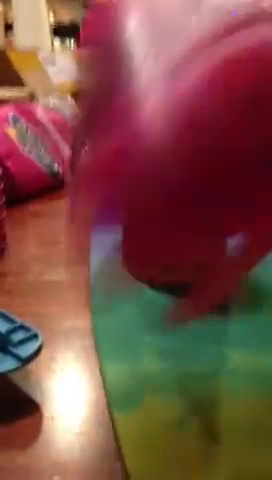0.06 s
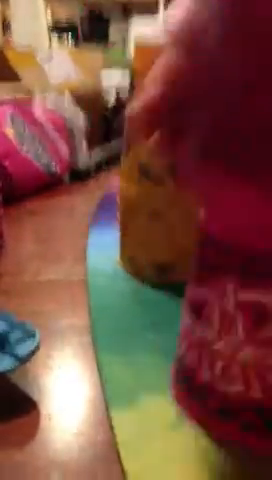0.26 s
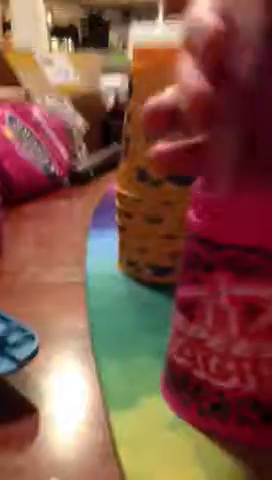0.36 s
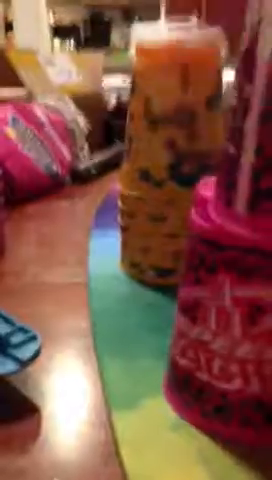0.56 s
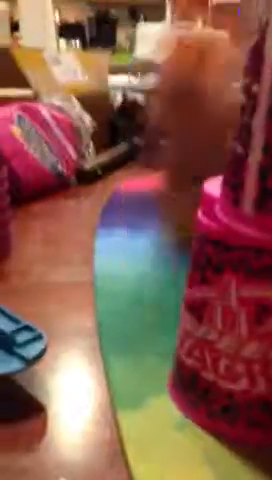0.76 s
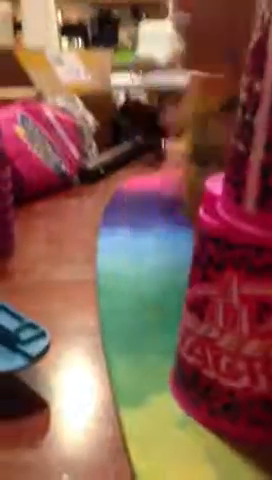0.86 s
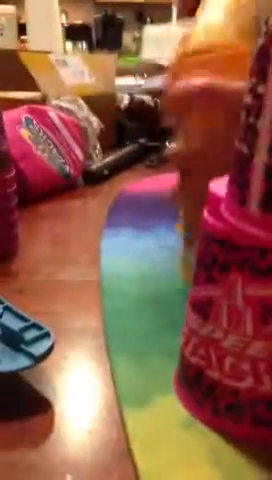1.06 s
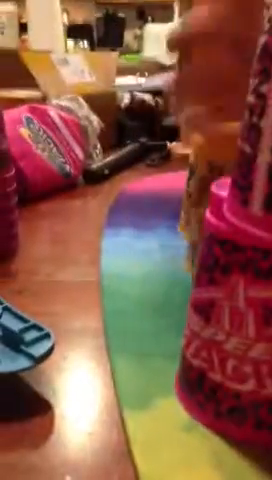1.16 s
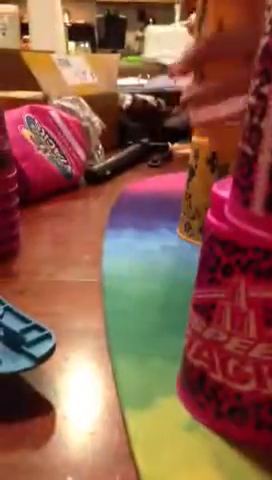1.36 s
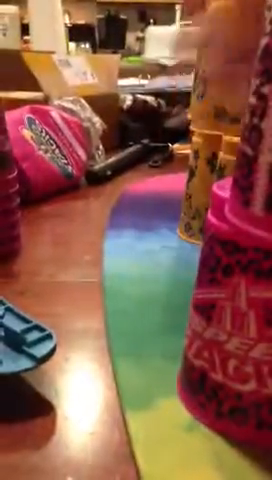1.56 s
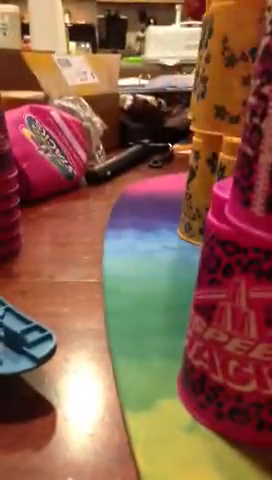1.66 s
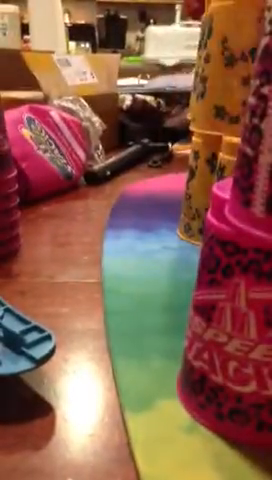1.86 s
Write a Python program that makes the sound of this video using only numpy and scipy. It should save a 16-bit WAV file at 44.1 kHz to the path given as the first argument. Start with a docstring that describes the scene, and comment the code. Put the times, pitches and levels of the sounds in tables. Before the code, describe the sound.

Plastic cups being speed-stacked on a mat, close in a small room. Light knocks, ticks and rubs open, with a hard clack at 0.26 s and another at 0.33, then the loudest tight cluster at 0.45-0.47, humming hollowly. A lull has soft rubs and faint breathy pulls around 0.75-0.95. Sparse knocks and thuds come at 1.1-1.35, a fast rattle at 1.45-1.53, a last clatter at 1.61, then a faint slide.

```python
"""Plastic cups are stacked and swept together fast on a mat, close to a small microphone in a room.
Over mat rumble and faint room noise, a rub of friction noise leads into knocks of flexing walls and rim cracks;
bright ticks, dull thuds and beating hums join in, up to the hardest clack, and the level dips briefly.
Soft rubs and breathy, rising puffs follow, then sparser knocks, a fast rattle, a last clatter and a faint slide.
Table and walls throw the clatter back as a few reflections and a diffuse noise tail."""
import sys
import numpy as np
from scipy import signal
from scipy.fft import rfft, irfft
from scipy.io import wavfile

SR = 44100
rng = np.random.default_rng(int(sys.argv[2]) if len(sys.argv) > 2 else 0)


def dump(signal):
    """Clip the signal to [-1, 1] and save it as 16-bit WAV at the path in sys.argv[1]."""
    limited = np.clip(np.atleast_2d(signal).T, -1, 1)
    pcm = np.round(limited * 32767).astype(np.int16)
    wavfile.write(sys.argv[1], SR, pcm)


N = 83790  # length in samples, 1.9 s


def amp(db):
    """Turns decibels into a linear gain."""
    return 10 ** (np.asarray(db) / 20)


def read(points, hz):
    """Reads a spectrum table, joined on a log-frequency axis."""
    f, value = np.transpose(points)
    return np.interp(np.log(hz + 1), np.log(f + 1), value)


def level(points):
    """A gain that follows a table of (t/s, level/dB)."""
    return amp(np.interp(np.arange(N) / SR, *np.transpose(points)))


def peak(hz, centre_hz, octaves):
    """A bell of height 1 on a log-frequency axis."""
    return np.exp(-(np.log2((hz + 1) / centre_hz) / octaves) ** 2)


def evened(x):
    """Scales a signal to unit RMS."""
    return x / np.sqrt(np.mean(x ** 2) + 1e-20)


def add(mix, s, sound):
    """Mixes a sound in at time s, trimmed to the ends of the mix."""
    at = round(s * SR)
    sound = sound[max(-at, 0):]
    part = mix[max(at, 0):][:len(sound)]
    part += sound[:len(part)]


def noise(colour, size):
    """Unit-RMS noise with a given spectrum."""
    gain = amp(read(colour, np.fft.rfftfreq(size, 1 / SR)))
    return evened(irfft(rfft(rng.standard_normal(size)) * gain, size))


def fade(t, t60):
    """Exponential decay that falls 60 dB in t60 seconds."""
    return np.exp(-np.log(1000) * t / t60)


def rise(t, rise_s):
    """A soft onset from silence, about two thirds open after rise_s seconds."""
    return 1 - np.exp(-(t / rise_s) ** 2)


def mode(t, hz, t60):
    """One resonance: a decaying sine."""
    return np.sin(2 * np.pi * hz * t) * fade(t, t60)


RUB_PEAK_DB, RUB_OCTAVES = 10, 0.97  # emphasis at the brightest pitch, and its spread
SLIPS_PER_S, SLIP_SHARE = 900, 0.62  # average slip rate; slip gain beside the friction noise
GRIP_DB, GRIP_S = 5.5, .002  # how strongly the grip comes and goes (deviation), time between its random points
# colour of plastic rubbing on plastic: (f/Hz, level/dB)
RUB = [(60, -27.5), (1300, 1), (4000, 3.5), (8000, -2.5), (11000, -5.5), (15500, -7.5)]
# cups sliding in one another: (t/s, length/s, level/dB, brightest f/Hz)
SLIDES = [(-.01, 0.038, -44, 4530), (.064, 0.039, -47, 5460), (.187, 0.054, -31.5, 5200),
          (.226, 0.019, -30.5, 7600), (.283, 0.022, -30.5, 6100), (.314, 0.014, -35.5, 4400),
          (.695, 0.11, -53.5, 2300), (.781, 0.018, -32, 7650), (.8, 0.093, -52.5, 6140),
          (.868, 0.073, -41, 4560), (1.022, 0.043, -50, 5530), (1.085, 0.047, -56.5, 6500),
          (1.227, 0.016, -45, 6600), (1.73, 0.086, -57, 4270)]


def slide(length, db, bright_hz):
    """Fine friction and small slips of plastic on plastic, swelling and dying with the stroke."""
    t = np.arange(SR // 2) / SR
    hz = np.fft.rfftfreq(len(t), 1 / SR)
    slips = rng.standard_normal(len(t)) * (rng.random(len(t)) < SLIPS_PER_S / SR)
    grip_curve = np.interp(t / GRIP_S, np.arange(len(t)), rng.standard_normal(len(t)))
    grip = evened(amp(GRIP_DB * grip_curve))
    drive = grip * rng.standard_normal(len(t)) + SLIP_SHARE * evened(slips)
    colour = read(RUB, hz) + RUB_PEAK_DB * peak(hz, bright_hz, RUB_OCTAVES)
    friction = evened(irfft(rfft(drive) * amp(colour), len(t)))
    stroke = np.sin(np.pi * np.minimum(t / length, 1))
    return amp(db) * friction * stroke


# rumble colour: (f/Hz, level/dB)
RUMBLE = [(40, -42), (150, -1.5), (240, 0), (800, -15), (8000, -51)]
# hands and cups shifting on the mat: (t/s, level/dB)
RUMBLE_LEVEL = [(0, -38), (.21, -55), (.3, -36.5), (.42, -54.5), (.5, -46.5), (.69, -64.5), (.8, -37.5),
                (.87, -54), (.95, -48), (1.04, -66), (1.16, -47.5), (1.31, -58), (1.4, -57.5), (1.9, -63.5)]


def mat_rumble():
    """Low noise of hands and cups shifting on the mat, swelling and sinking."""
    return level(RUMBLE_LEVEL) * noise(RUMBLE, N)


FLOOR_DB = -60
# room noise colour: (f/Hz, level/dB)
FLOOR = [(30, -16), (200, -15.5), (800, -6.5), (1200, -14), (4000, -11), (6400, -13.5), (8000, -19),
         (16000, -30)]


def room_noise():
    """Faint steady noise of the room."""
    return amp(FLOOR_DB) * noise(FLOOR, N)


WALL_T60, WALL_RISE_S, WALL_DB = 0.014, 0.0017, 8.5  # wall decay (s), onset (s) and lift (dB)
HOLLOW_RISE_S = 0.00094
# air in the cups: (multiple of the hollow pitch, level/dB, t60/s)
HOLLOW = [(0.638, -11, 0.098), (0.999, 6, 0.038), (1.21, -8, 0.054), (1.482, -15, 0.064)]


def flex(wall_db, wall_hz, hollow_db, hollow_hz):
    """The wall flexes for a few cycles and the air inside rings on."""
    t = np.arange(SR // 8) / SR
    wall = mode(t, wall_hz, WALL_T60) * rise(t, WALL_RISE_S)
    air = sum(amp(db) * mode(t, hollow_hz * ratio, t60) for ratio, db, t60 in HOLLOW)
    hollow = air * rise(t, HOLLOW_RISE_S)
    return amp(hollow_db) * hollow - amp(wall_db + WALL_DB) * wall


SHELL_SPREAD, SHELL_DB = 0.02, -12  # random detuning of each mode (fraction); shell level in the crack
CRACK_T60 = 0.019  # s
RIM_DB, RIM_T60, RIM_ROLLOFF = -1, 0.015, 1.92  # ping level, decay (s); crack dulls above this multiple of rim f
# stiff plastic shell, before detuning: (f/Hz, level/dB, t60/s)
SHELL = [(1480, -8.5, 0.02), (1810, -1.5, 0.04), (3210, -16, 0.057), (4207, -6, 0.038), (5320, -7.5, 0.051),
         (6600, -25, 0.045)]
# crack colour before the rim rolloff: (f/Hz, level/dB)
CRACK = [(60, -2), (900, 5), (1700, 6), (2400, -1), (3500, 1), (7000, -0.5), (10000, -15), (15500, -35)]
# cup knocks: (t/s, wall level/dB before WALL_DB, wall f/Hz, hollow level/dB, hollow f/Hz,
# rim crack level/dB, rim f/Hz)
KNOCKS = [ (.001, -28, 320, -30.5, 615, -39, 4030), (.035, -20.5, 373, -32, 687, -30, 2040),
          (.0488, -35, 330, -32.5, 658, -41, 3420), (.1008, -25.5, 584, -29.5, 872, -29.5, 1670),
          (.2415, -23, 335, -26, 602, -49, 2500), (.261, -8.5, 461, -15, 735, -11.5, 1670),
          (.3265, -11, 446, -24, 754, -22.5, 3030), (.4452, -11.5, 435, -21, 776, -30, 1930),
          (.4605, -8.5, 518, -14, 812, -12.5, 6200), (.4652, -6, 540, -18.5, 714, -19, 1850),
          (.471, -7, 580, -19, 878, -17.5, 4060), (.9494, -29, 244, -37, 819, -32, 3300),
          (1.11, -10.5, 356, -25, 665, -38, 2160), (1.2296, -17, 452, -28.5, 634, -35, 2800),
          (1.2651, -30, 422, -34, 615, -36.5, 4000), (1.4486, -7, 517, -17.5, 806, -22.5, 3290),
          (1.4617, -10, 490, -19, 797, -30.5, 3450), (1.4749, -18.5, 510, -27, 875, -29.5, 3200),
          (1.4855, -26, 527, -29.5, 760, -46, 3020), (1.4947, -13.5, 488, -28, 835, -33, 4220),
          (1.5065, -17, 493, -25.5, 783, -38.5, 4300), (1.529, -31, 555, -37.5, 767, -35.5, 5320),
          (1.6133, -7, 552, -19, 783, -18, 4830), (1.6171, -6.5, 520, -13.5, 817, -16, 4200),
          (1.6248, -13.5, 543, -36, 770, -36, 2530)]


def knock(wall_db, wall_hz, hollow_db, hollow_hz, crack_db, rim_hz):
    """Cup on cup: the body flexes, and the rim cracks, pings and rings the shell's modes."""
    t = np.arange(SR // 8) / SR
    hz = np.fft.rfftfreq(len(t), 1 / SR)
    shell = np.zeros(len(t))
    for f, db, t60 in SHELL:
        detuned_hz = f * (1 + SHELL_SPREAD * rng.standard_normal())
        shell += amp(db) * rng.choice([-1, 1]) * mode(t, detuned_hz, t60)
    contact = 1 / (1 + (hz / (RIM_ROLLOFF * rim_hz)) ** 2) ** .5
    burst = evened(irfft(rfft(noise(CRACK, len(t))) * contact, len(t)))
    ping = amp(RIM_DB) * mode(t, rim_hz, RIM_T60)
    crack = burst * fade(t, CRACK_T60) + amp(SHELL_DB) * shell + ping
    return flex(wall_db, wall_hz, hollow_db, hollow_hz) + amp(crack_db) * crack


# room level follows how far the cups are from the microphone: (t/s, level/dB)
ROOM_SEND = [(.1, -3.5), (.3, -7), (.47, -9), (.8, -3), (1.45, 3), (1.62, 0)]
# near reflections: (delay t/s, linear gain)
ECHOES = [(.0046, 0.027), (.0098, 0.1), (0.0194, 0.025)]
# tail decay: (f/Hz, t60/s)
ROOM_T60 = [(150, 0.48), (400, 0.27), (900, 0.5), (5000, 0.15), (15000, 0.23)]
# tail colour: (f/Hz, level/dB)
ROOM_DB = [(60, -28), (170, -3.5), (300, -6), (600, -12), (950, -12.5), (1300, -8.5), (2200, -5),
           (4500, -5), (12000, -8)]
ROOM_RISE_S = 0.0029


def room(cups):
    """A few near reflections and a diffuse tail whose bands die at their own speeds."""
    hz, t, bands = signal.stft(rng.standard_normal(SR * 3 // 4), SR, nperseg=512)
    t60 = read(ROOM_T60, hz)[:, None]
    # the last factor evens out the energy of short and long decays
    even = np.sqrt(2 * np.log(1000) / (t60 * SR))
    bands = bands * fade(t, t60) * amp(read(ROOM_DB, hz))[:, None] * even
    response = signal.istft(bands, SR, nperseg=512)[1]
    response = response * rise(np.arange(len(response)) / SR, ROOM_RISE_S)
    for delay, gain in ECHOES:
        add(response, delay, np.array([gain]))
    return signal.fftconvolve(cups * level(ROOM_SEND), response)[:N]


TICK_T60 = 0.014  # s
# tick colour: (f/Hz, level/dB)
TICK = [(200, -9), (1800, -9.5), (3300, 5), (7500, -1), (10000, -8.5), (15500, -16.5)]
# rims clicking past each other: (t/s, level/dB)
TICKS = [(.0471, -23), (.0555, -31), (.086, -30), (.128, -43), (.136, -28), (.2483, -25), (.261, -18),
         (.4648, -21), (.1955, -26), (.208, -22.5), (.219, -30), (.7823, -36.5), (.853, -39.5),
         (.9145, -38)]


def tick(db):
    """A thin bright click of two rims: a quickly dying noise burst."""
    t = np.arange(SR // 20) / SR
    return amp(db) * noise(TICK, len(t)) * fade(t, TICK_T60)


THUD_HOLLOW_DB, THUD_HOLLOW_HZ = -20.5, 604  # air level relative to the tabled wall level; air pitch
# dull thuds of cups against the mat and the hands: (t/s, wall level/dB before WALL_DB, wall f/Hz)
THUDS = [(.0891, -24, 450), (.1302, -26, 590), (.1566, -26, 278), (.166, -27, 338), (.2889, -20.5, 383),
         (.3, -15, 378), (.3432, -20, 470), (.37, -23.5, 362), (.856, -34, 564), (1.071, -34.5, 380),
         (1.1218, -24, 334), (1.1575, -25, 445), (1.2345, -18, 292), (1.288, -25, 370), (1.3469, -29, 353),
         (1.372, -37.5, 266), (1.569, -25, 470), (1.576, -26, 527), (1.757, -43, 710)]


def thud(db, hz):
    """A cup meets the mat or a hand: it flexes without a crack."""
    return flex(db, hz, db + THUD_HOLLOW_DB, THUD_HOLLOW_HZ)


HUM_T60, HUM_SPREAD = 0.38, 0.051  # decay (s); random detuning from cup to cup (fraction)
# upright cups that hum on after a hard knock: (t/s, centre f/Hz, level/dB)
HUMS = [(.328, 1043, -46.5), (.464, 943, -31), (1.264, 642, -51), (1.45, 823, -46), (1.614, 840, -41.5)]


def hum(hz, db, count=12):
    """The air in a few untouched cups, not quite in tune with one another, rings on, beating."""
    t = np.arange(SR // 2) / SR
    cups = np.zeros(len(t))
    for _ in range(count):
        cup_hz = hz * (1 + HUM_SPREAD * rng.standard_normal())
        cups += rng.choice([-1, 1]) * mode(t, cup_hz, HUM_T60)
    return amp(db) * cups / np.sqrt(count)


DIP_START_S, DIP_S, DIP_DB = 0.47, 0.34, -3.5


def level_dip():
    """The level dips briefly after the hardest clack, deepest halfway through."""
    return level([(DIP_START_S, 0), (DIP_START_S + DIP_S / 2, DIP_DB), (DIP_START_S + DIP_S, 0)])


PUFF_ROUGH, PUFF_GRAIN_S = 0.99, 0.00353  # flutter depth; time between its random points
# cups pulled out of one another: (t/s, length/s, level/dB, start f/Hz, end f/Hz)
PUFFS = [(.758, 0.066, -39, 190.3, 283.5), (.898, 0.02, -37.5, 500, 718), (.924, .014, -35, 794, 804)]


def puff(length, db, from_hz, to_hz):
    """A soft, breathy tone that rises as a cup is pulled out of another."""
    t = np.arange(0, length, 1 / SR)
    glide_hz = from_hz + (to_hz - from_hz) * t / length
    turn = np.exp(2j * np.pi * np.cumsum(glide_hz) / SR)
    a, b = rng.standard_normal((2, 64))
    # random amplitude and phase make the tone breathy
    flutter = np.interp(t / PUFF_GRAIN_S, np.arange(len(a)), a + 1j * b)
    tone = (turn * (1 + PUFF_ROUGH * flutter)).imag
    return amp(db) * tone * np.sin(np.pi * t / length)


def scene():
    """Layers the cups, their room, the mat rumble and the room noise under one brief level dip."""
    cups = np.zeros(N)
    layers = [(SLIDES, slide), (KNOCKS, knock), (TICKS, tick), (THUDS, thud), (HUMS, hum), (PUFFS, puff)]
    for table, sound in layers:
        for s, *settings in table:
            add(cups, s, sound(*settings))
    mix = cups + room(cups) + mat_rumble() + room_noise()
    return (level_dip() * mix)[None]


EDGE_HZ = 15500  # upper band limit
# microphone response: (f/Hz, level/dB)
MIC = [(20, -10), (90, -13.5), (150, 1), (300, 1), (15000, -2.5)]


def record(dry):
    """The small microphone loses the bass through a minimum-phase filter; then the band limit."""
    size = 8192
    log_gain = np.log(amp(read(MIC, abs(np.fft.fftfreq(size, 1 / SR)))))
    # the Hilbert transform of the log gain gives the minimum phase
    spectrum = np.exp(np.conj(signal.hilbert(log_gain)))
    response = np.fft.ifft(spectrum).real[:size // 2]
    coloured = signal.fftconvolve(dry, response[None])[:, :N]
    lowpass = signal.firwin(255, EDGE_HZ, window=("kaiser", 9), fs=SR)
    return signal.oaconvolve(coloured, lowpass[None], "same")


dry = scene()
out = record(dry)
dump(out)
```